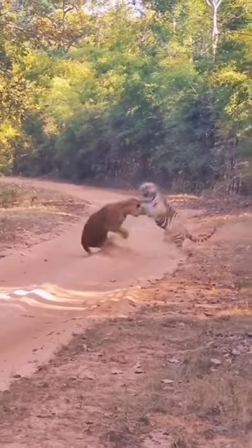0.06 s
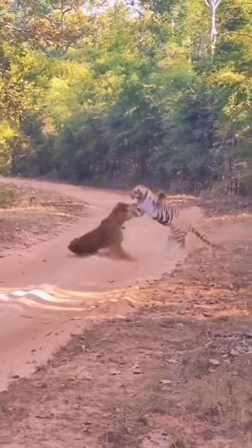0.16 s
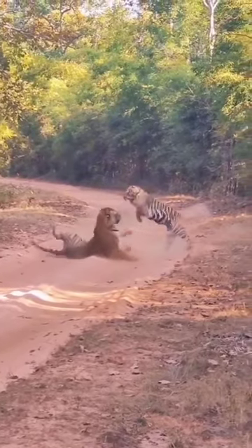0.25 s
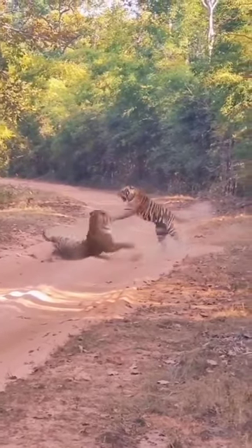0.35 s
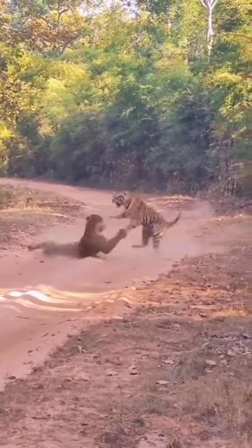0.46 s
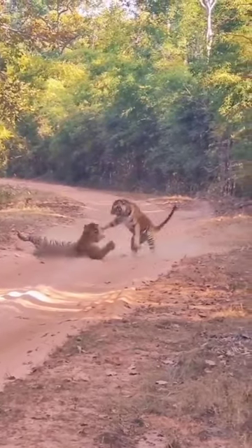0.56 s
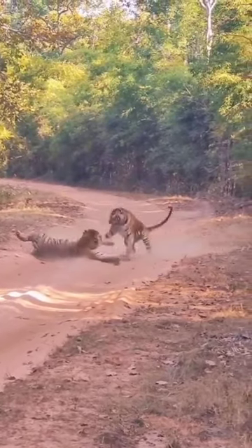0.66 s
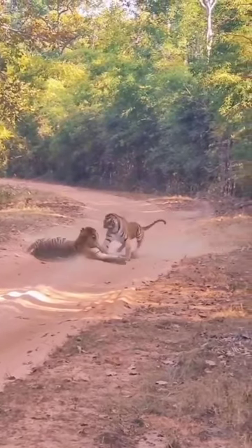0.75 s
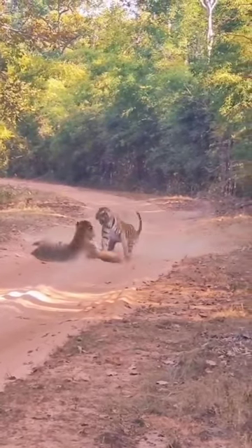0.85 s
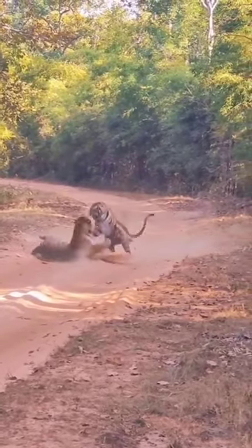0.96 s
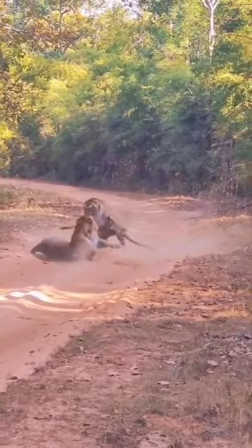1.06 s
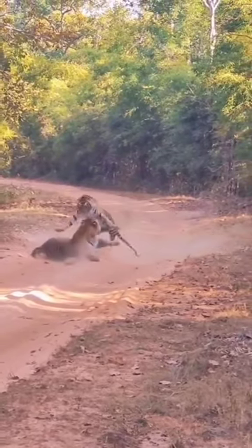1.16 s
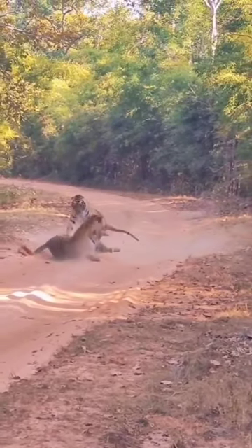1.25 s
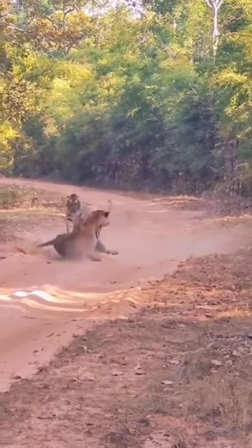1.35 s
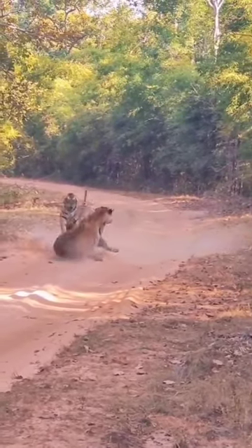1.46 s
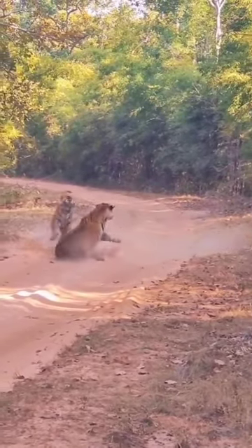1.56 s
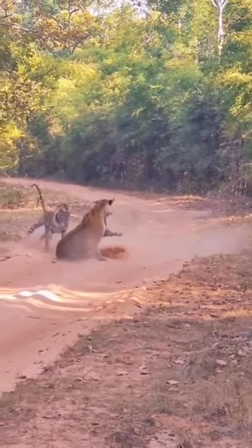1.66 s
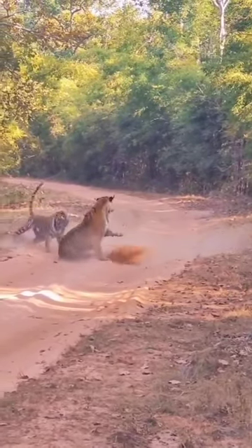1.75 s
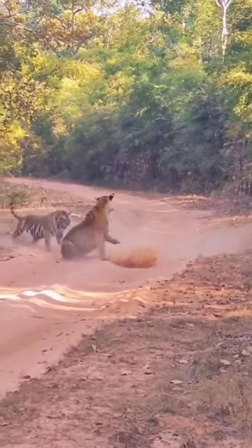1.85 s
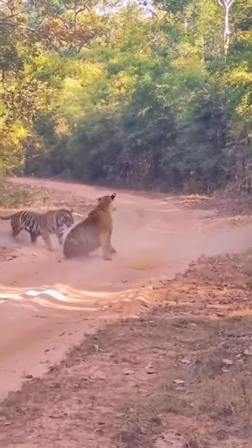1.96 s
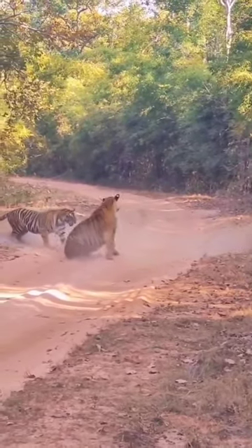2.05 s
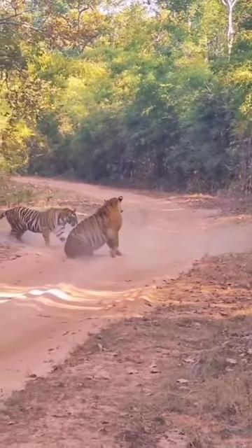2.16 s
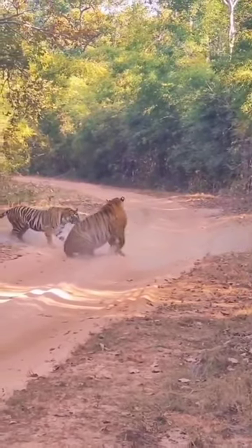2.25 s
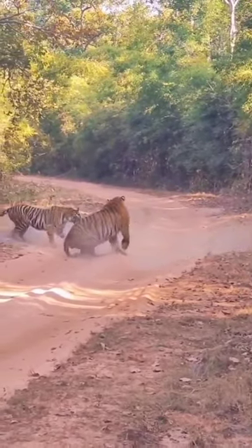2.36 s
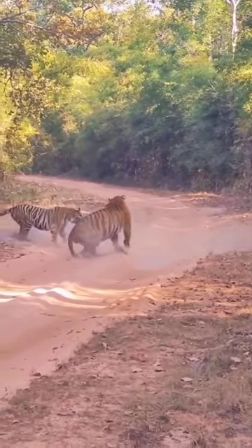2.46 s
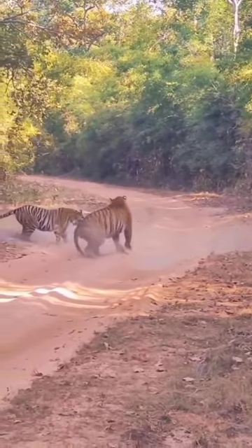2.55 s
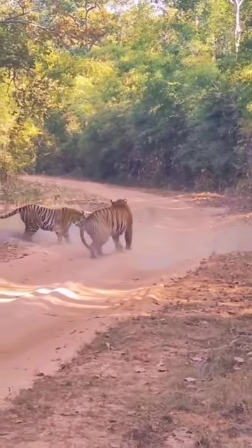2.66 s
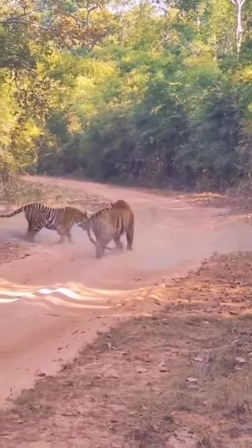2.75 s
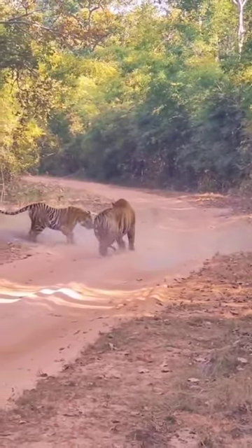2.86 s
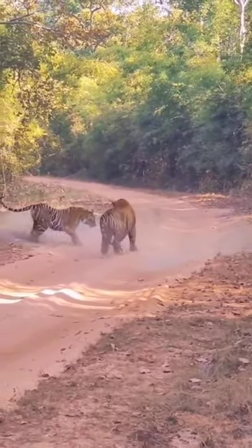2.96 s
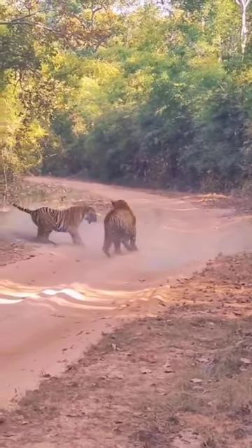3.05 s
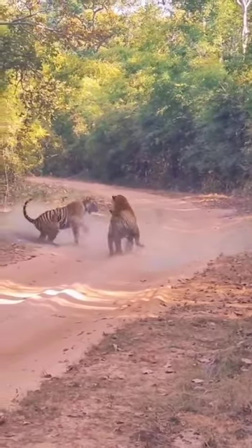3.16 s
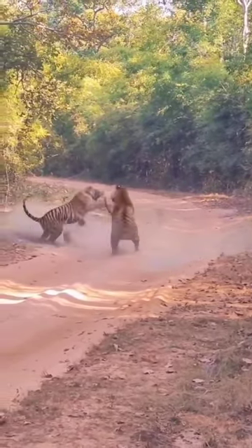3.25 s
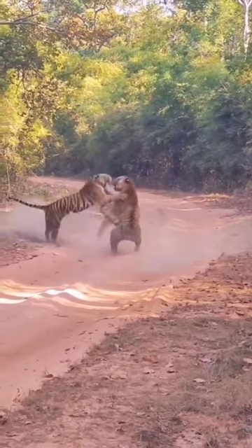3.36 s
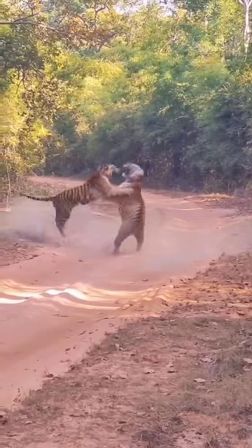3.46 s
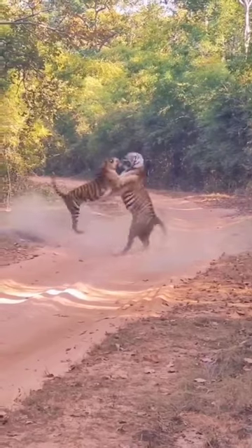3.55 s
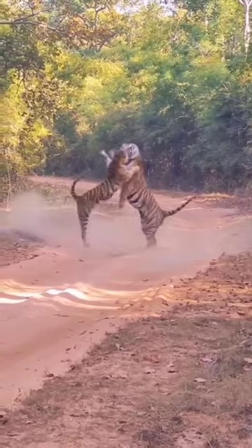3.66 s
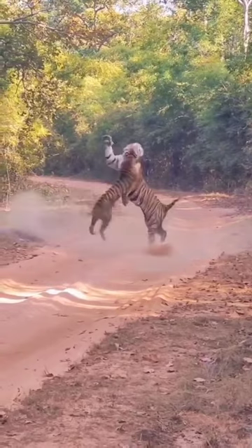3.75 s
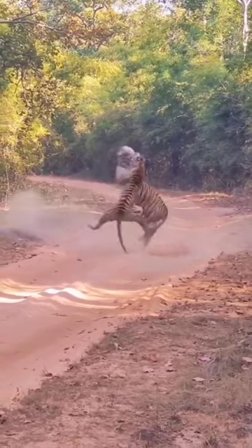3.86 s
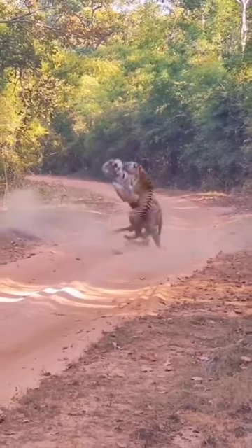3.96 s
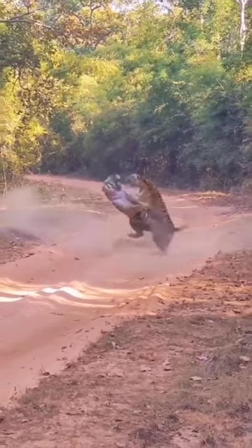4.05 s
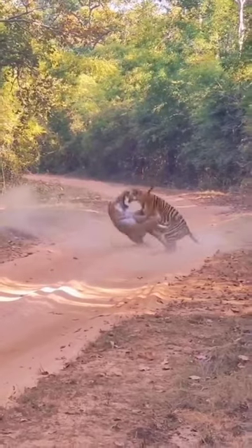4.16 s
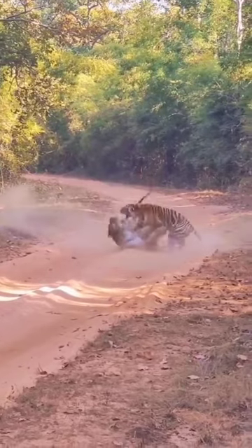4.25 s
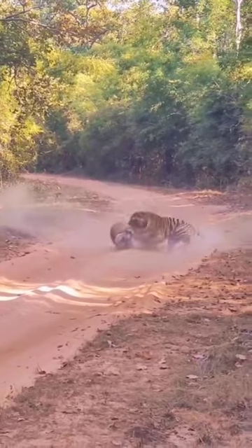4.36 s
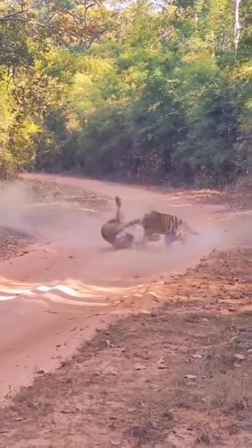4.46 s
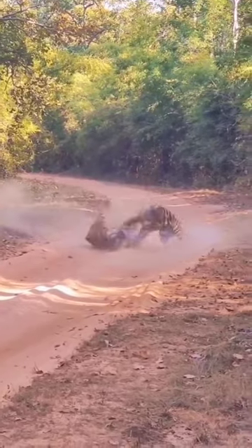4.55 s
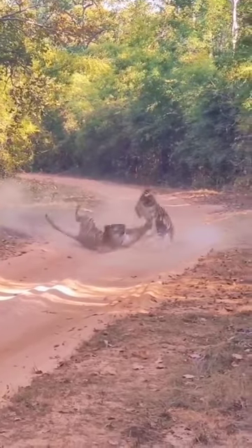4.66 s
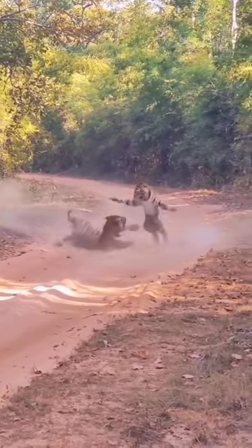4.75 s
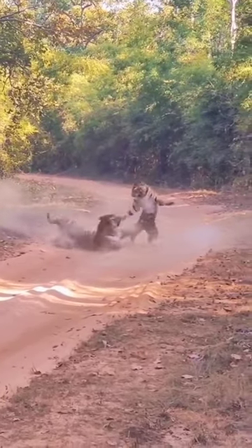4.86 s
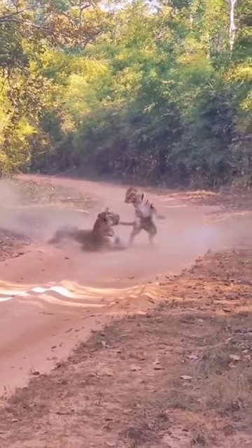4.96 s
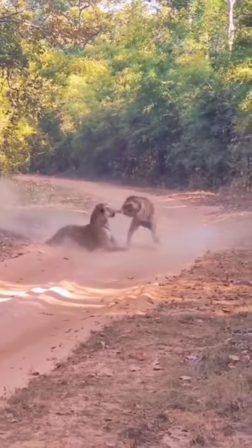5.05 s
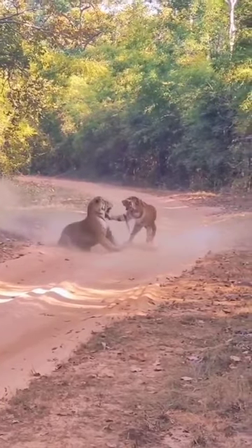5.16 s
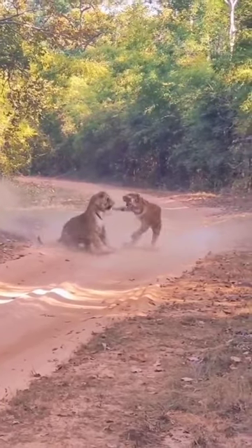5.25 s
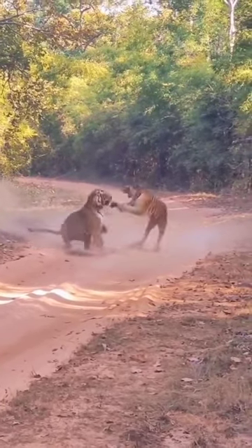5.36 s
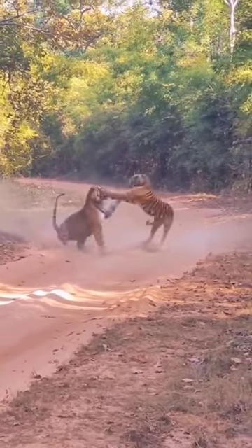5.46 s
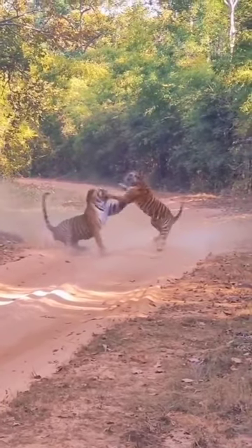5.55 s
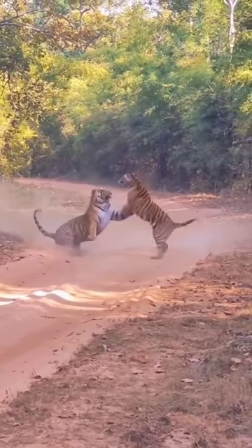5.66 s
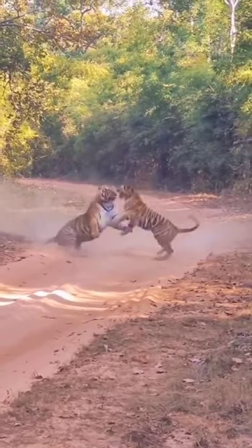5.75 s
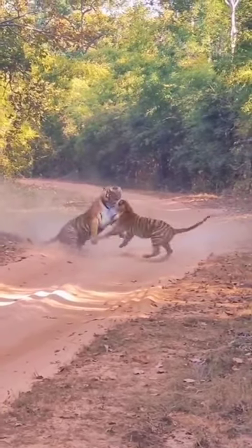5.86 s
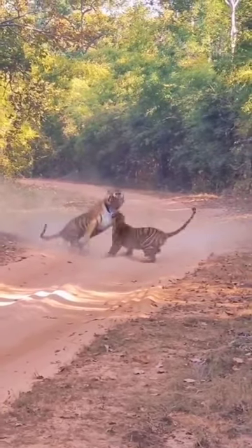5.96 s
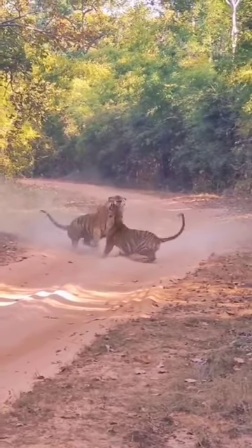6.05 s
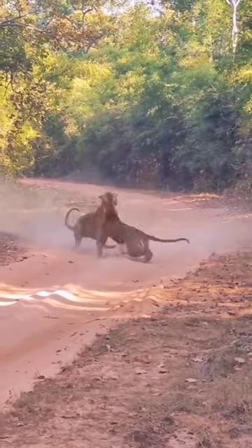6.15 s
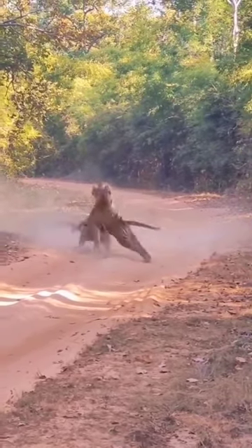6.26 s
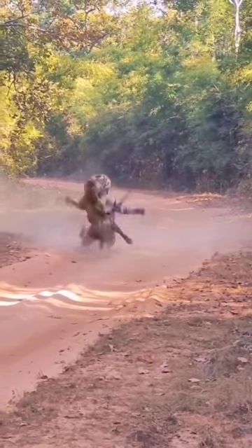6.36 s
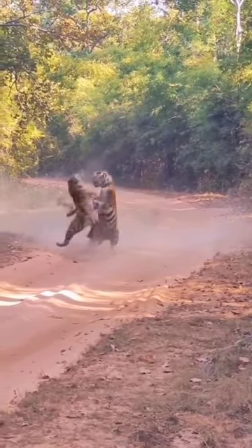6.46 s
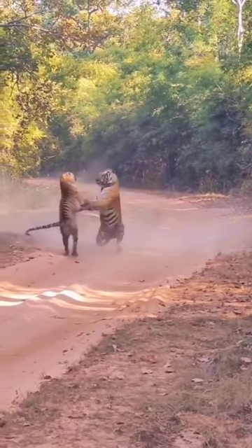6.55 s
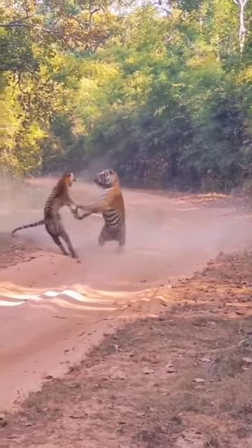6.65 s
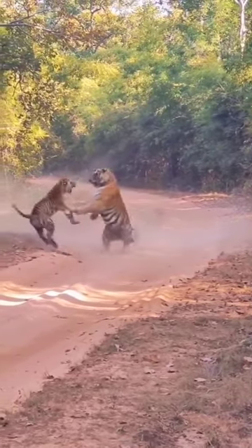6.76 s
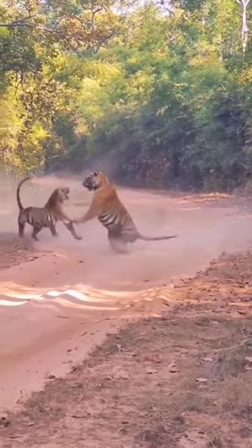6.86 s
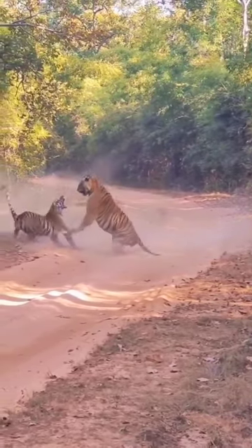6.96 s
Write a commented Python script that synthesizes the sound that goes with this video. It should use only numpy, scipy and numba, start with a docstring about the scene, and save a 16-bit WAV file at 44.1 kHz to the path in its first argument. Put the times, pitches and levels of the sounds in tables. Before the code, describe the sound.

On a quiet forest track two tigers fight, heard in stereo from a short distance. From 0 to 1.9 seconds, coarse throaty roars burst out at about 0.2, 0.6, 1.1 and 1.6, each under a third of a second, with fluttering growls, raspy breathy snarls and a low held moan near 1.3 to 1.5. Paws scrape dry grit. The roars stop, and from 2.1 to 2.75 a camera shutter fires eight fast, dry ticks with small rattles. Growling returns at 3.2, then roars erupt at 3.4 to 3.7, peaking around 4.2 with a strong, clear low note, followed by a short bark at 4.45 and another roar at 4.6. Twigs crack and paws swipe the dirt. Another roar at 5.4 gives way to weaker snarls near 6, 6.3 and 6.6, while scuffing grows towards 7. Trees return short, diffuse echoes.

```python
"""Tigers fighting on a forest track

Two tigers roar in quick bursts with low growls in between. Slack vocal folds slap unevenly and ring the
throat; at the height of some roars they lock into a clean note. Air chopped by the folds makes the snarl:
noise through the pharynx, mouth and teeth. In a lull a camera shutter fires a burst of ticks and rattles.
Paws scuff the dirt and snap twigs (shaped noise), and the trees answer with two echoes (decaying noise)."""
import sys
import numpy as np
from scipy import signal
from scipy.fft import rfft, irfft, next_fast_len
from scipy.io import wavfile
from scipy.ndimage import uniform_filter1d, map_coordinates
from numba import njit

SR = 44100
rng = np.random.default_rng(int(sys.argv[2]) if len(sys.argv) > 2 else 0)


def wav_out(sig):
    """Save sig, one row per channel (or a flat mono array), as 16-bit PCM at SR to the path in sys.argv[1]."""
    wavfile.write(sys.argv[1], SR, np.round(np.clip(np.atleast_2d(sig).T, -1, 1) * 32767).astype(np.int16))


N = 308744

# roars and snarls: (start [s], rise [s], fall [s], lag of the jaws [s],
# resonances at the peak of throat [Hz], pharynx [Hz], mouth [Hz],
# peak level of throat [dB], pharynx [dB], mouth [dB], hiss at the teeth [dB])
ROARS = [ (-0.1, 0.081, 0.12, 0, 287, 487, 1690, -22.5, -27.5, -35.5, -36),
         (0.128, 0.14, 0.12, 0.0099, 261.6, 556, 1170, -10, -23, -33, -35),
         (0.52, 0.073, 0.094, 0.00026, 292.5, 830, 1300, -12.5, -22.5, -24, -25.5),
         (0.997, 0.084, 0.093, 0, 296.4, 834, 1980, -13, -24, -27.5, -25),
         (1.279, 0.049, 0.14, 0.021, 238, 870, 1690, -25.5, -34, -35.5, -40.5),
         (1.567, 0.069, 0.065, 0.00072, 316.1, 848, 2300, -16.5, -24.5, -24.5, -23),
         (1.871, 0.084, 0.031, 0, 238.3, 756, 1742, -36.5, -36.5, -37.5, -35),
         (3.226, 0.043, 0.061, 0, 206, 533, 1919, -30.5, -30, -38, -44.5),
         (3.402, 0.038, 0.14, 0.00035, 311.4, 970, 1628, -17.5, -26, -28.5, -30),
         (3.534, 0.058, 0.12, 0.00082, 273.4, 835, 1109, -10, -27, -26.5, -30.5),
         (3.731, 0.1, 0.097, 0.003, 215.6, 613, 960, -20.5, -29.5, -35, -38.5),
         (3.998, 0.19, 0.11, 0.024, 272.7, 880, 1200, -12, -25, -27.5, -30.5),
         (4.301, 0.081, 0.058, 0, 250.2, 412, 1870, -18.5, -31, -41.5, -37.5),
         (4.568, 0.078, 0.0997, 0.016, 300.6, 854, 1730, -11.5, -23, -29.5, -27),
         (4.761, 0.065, 0.058, 0, 284.5, 403, 1570, -21.5, -31, -31.5, -36),
         (5.024, 0.039, 0.087, 0, 224.4, 607, 1610, -25.5, -32.5, -33.5, -39),
         (5.331, 0.086, 0.069, 0, 290.2, 867.5, 1320, -12.5, -23.5, -28, -30.5),
         (5.88, 0.12, 0.097, 0.0072, 334.3, 821.5, 1175, -22, -27, -31.5, -29),
         (6.299, 0.035, 0.086, 0.01, 226.4, 803, 1890, -40, -35, -38, -37),
         (6.555, 0.081, 0.084, 0.015, 346.4, 842, 1450, -23.5, -27, -33.5, -34.5), ]
# colour the chest gives to growls and to the rumble under a roar: (frequency [Hz], level [dB])
CHEST = [(20, -58.5), (45, -20), (75, -11.5), (110, -4), (230, 3.5), (330, -58)]


def amp(db):
    """Turn decibels into gain."""
    return 10 ** (np.asarray(db) / 20)


def unit(x):
    """Scale to an rms of 1."""
    return x / np.sqrt(np.mean(x ** 2) + 1e-20)


def steady(x, span):
    """Even out the loudness to rms 1 over about span seconds; faster flutter stays."""
    size = max(int(span * SR / 2), 2)
    power = uniform_filter1d(uniform_filter1d(x ** 2, size), size)
    floor = 1e-4 * np.mean(x ** 2)
    return x / np.sqrt(np.abs(power) + floor)


def along(points, hz):
    """Read (frequency [Hz], value) points along a logarithmic frequency axis."""
    f, v = np.transpose(points)
    return np.interp(np.log(hz + 1), np.log(f + 1), v)


def curves(rows):
    """Draw one curve over time for each column after the time."""
    s, *cols = np.transpose(rows)
    return [np.interp(np.arange(N) / SR, s, c) for c in cols]


def wobble(rate):
    """Draw a smooth random curve with rate knots a second."""
    knots = rng.standard_normal(int(N * rate / SR) + 4)
    return map_coordinates(knots, [np.arange(N) * rate / SR])


def during(rows, fade):
    """Gate that is 1 from the first row's time to the last, with soft edges."""
    t = np.arange(N) / SR
    inside = np.minimum(t - rows[0][0], rows[-1][0] - t)
    return np.clip(inside / fade + .5, 0, 1)


def filtered(x, response):
    """Multiply the spectrum of x by a response to frequency."""
    m = next_fast_len(N + SR // 2)
    return irfft(rfft(x, m) * response(np.fft.rfftfreq(m, 1 / SR)), m)[..., :N]


def coloured(x, spectrum):
    """Pass x through a (frequency [Hz], level [dB]) spectrum."""
    return filtered(x, lambda hz: amp(along(spectrum, hz)))


@njit
def sweep(x, step, damping):
    """A two-pole band-pass whose centre may move with every sample."""
    out, low, band = np.zeros(len(x)), 0.0, 0.0
    for i in range(len(x)):
        low += step[i] * band
        band += step[i] * (x[i] - low - damping * band)
        out[i] = band
    return out


def resonate(x, centre_hz, q):
    """Tongue and lips keep a cavity's resonance moving; two passes make its skirts steep."""
    waver_octaves = 0.11 * wobble(24)
    hz = np.minimum(centre_hz * 2 ** waver_octaves, SR / 6)
    step, damping = 2 * np.sin(np.pi * hz / SR), 1 / max(q, 2)
    once = sweep(x, step, damping)
    return steady(sweep(once, step, damping), span=.1)


def patchy(x, depth_db):
    """Let random peaks and dips come and go across the spectrum."""
    z = signal.stft(x, nperseg=512)[2]
    field = rng.standard_normal(z.shape)
    field = uniform_filter1d(field, 3, 0)  # smooth over frequency
    field = uniform_filter1d(field, 10, 1)  # smooth over time
    return signal.istft(z * amp(depth_db * unit(field)), nperseg=512)[1][:N]


def lay(at, grains):
    """Sum rows of grains, each starting at its own sample."""
    places = at[:, None] + np.arange(grains.shape[1])
    return np.bincount(places.ravel(), grains.ravel(), N)[:N]


def clicks(rows, spectrum, t60, rise):
    """Dry contacts at (time [s], level [dB]): dying bursts of noise through a body's colour."""
    s, db = np.transpose(rows)
    t = np.arange(SR // 12) / SR
    envelope = amp(db[:, None] - 60 * t / t60) * (1 - np.exp(-t / rise))
    grains = envelope * rng.standard_normal((len(s), len(t)))
    return coloured(lay(np.round(s * SR).astype(int), grains), spectrum)


def folds(rate_hz, jitter, scatter_db, puff):
    """Slack folds slap unevenly: return slap samples, sizes, the slap train and the puffs of air let through."""
    cycles = np.cumsum(rate_hz * np.exp(jitter * wobble(70))) / SR
    at = np.flatnonzero(np.diff(np.floor(cycles)))
    size = amp(scatter_db * rng.standard_normal(len(at)))
    slaps = unit(np.bincount(at, size, N))
    t = np.arange(SR // 30) / SR
    puffs = unit(lay(at, size[:, None] * t * np.exp(-t / puff)))
    return at, size, slaps, puffs


def air(puffs, leak):
    """Turbulent noise, chopped by the folds except for a steady leak."""
    return unit((puffs + leak) * rng.standard_normal(N))


def throat_ring(at, size, centre_hz, life, rise, spread):
    """Every slap sets off a dying sine at the resonance of that moment, give or take a spread."""
    t = np.arange(SR // 20) / SR
    hz = centre_hz[at] * np.exp(spread * rng.standard_normal(len(at)))
    envelope = np.exp(-t / life) * (1 - np.exp(-t / rise))
    return lay(at, size[:, None] * np.sin(2 * np.pi * hz[:, None] * t) * envelope)


def cycle_phase(pitch_hz, jitter):
    """Phase of folds that vibrate almost regularly."""
    return 2 * np.pi * np.cumsum(pitch_hz * (1 + jitter * wobble(150))) / SR


def harmonics(phase, levels):
    """Stack sines at whole multiples of the pitch, at rms 1."""
    return unit(sum(amp(db) * np.sin(k * phase) for k, db in enumerate(levels, 1)))


def swell(peaks_db, attacks_s, onset_s, depth_db, roundness, release_db_per_s):
    """Gain of each roar, one row each: it bursts in, swells by depth_db to its peak, sinks and is released."""
    t, gains = np.arange(N) / SR, np.zeros((len(ROARS), N))
    for gain, (start, rise, fall, *_), db, attack_s in zip(gains, ROARS, peaks_db, attacks_s):
        near = (t > start - onset_s) & (t < start + 1)
        age = t[near] - start
        # 0 at the peak, 1 where the roar begins and where its fall ends
        slack = np.clip(np.maximum(1 - age / rise, (age - rise) / fall), 0, 1)
        fading = release_db_per_s * np.maximum(age - rise - fall, 0)
        attack = np.clip((age + onset_s / 2) / attack_s, 0, 1)
        gain[near] = attack * amp(db - depth_db * slack ** roundness - fading)
    return gains


def effort():
    """Gains of throat, pharynx, mouth and teeth, then the resonances; the snarl waits for the jaws."""
    (start, rise, _, lag, hz, pharynx_hz, mouth_hz,
     throat_db, pharynx_db, mouth_db, hiss_db) = np.transpose(ROARS)
    folds_s, jaws_s = 0.0118, 0.032  # attack times: the folds start faster than the jaws
    at_once, with_jaws = np.full(len(ROARS), folds_s), jaws_s + 2 * abs(lag)
    layers = [swell(throat_db, at_once, folds_s, depth_db=8.0, roundness=0.87, release_db_per_s=190.5),
              swell(pharynx_db, with_jaws, jaws_s, depth_db=3.5, roundness=2.1, release_db_per_s=110.5),
              swell(mouth_db, with_jaws, jaws_s, depth_db=4.5, roundness=2.0, release_db_per_s=172.0),
              swell(hiss_db, with_jaws, jaws_s, depth_db=4.0, roundness=1.5, release_db_per_s=144.0)]
    gains = [np.linalg.norm(layer, axis=0) + 1e-9 for layer in layers]
    loudest = np.argmax(layers[0], axis=0)  # this roar sets the resonances
    age = np.maximum(np.arange(N) / SR - start[loudest], 0)
    # slow jaws let the throat's resonance start up to 0.3 octaves lower
    opening = 0.3 * np.exp(-age / (2 * abs(lag[loudest]) + 1e-4))
    # it sinks by 2.8 octaves a second around the peak as the jaws close
    closing = 2.8 * np.clip(age - rise[loudest], -0.07, 0.09)
    glide = 2 ** (-opening - closing)
    upper_glide = glide ** 0.25  # the upper resonances follow a quarter of the glide
    upper = [f[loudest] * upper_glide for f in (pharynx_hz, mouth_hz)]
    return gains, [hz[loudest] * glide] + upper


def roars():
    """Fold slaps ring throat and pharynx, and chop the air that rasps through the open mouth in surges."""
    # broad colour of each cavity: (frequency [Hz], level [dB])
    pharynx_colour = [(200, -34.5), (390, 8), (600, 1), (950, -1.5), (1400, -72)]
    mouth_colour = [(600, -22.5), (950, -10), (1100, -2.5), (1600, 1), (2100, -4), (2700, -15), (4500, -33)]
    teeth_colour = [(1500, -11.5), (2300, 2), (4000, 2.5), (6100, 2.5), (7000, -13.5), (8200, -14),
                    (10300, -14), (13000, -28)]
    (throat_gain, pharynx_gain, mouth_gain, hiss_gain), (centre_hz, pharynx_hz, mouth_hz) = effort()
    slap_hz = 64 * (centre_hz / 280) ** .5
    at, size, slaps, puffs = folds(slap_hz, jitter=.3, scatter_db=3.5, puff=0.0094)
    notes, locked = clean_notes()

    ring = unit(throat_ring(at, size, centre_hz, life=.0075, rise=.004, spread=.09))
    ring = filtered(ring, lambda hz: hz ** 4 / (hz ** 4 + 150 ** 4))  # the mouth radiates little bass
    throat = steady(ring, span=0.024)

    # each cavity adds a narrower resonance to its broad colour
    drive = 0.38 * slaps + air(puffs, leak=1.0)
    pharynx = unit(coloured(drive, pharynx_colour)) + amp(-2.5) * resonate(drive, pharynx_hz, q=4.77)
    pharynx = steady(patchy(pharynx, depth_db=2.2), span=.09)

    rasp = air(puffs, leak=2.0) + 0.37 * slaps
    mouth = unit(coloured(rasp, mouth_colour)) + amp(-3.5) * resonate(rasp, mouth_hz, q=3.8)
    mouth = steady(patchy(mouth, depth_db=5), span=.08)

    jet = air(puffs, leak=4.1)
    teeth_ring = resonate(air(puffs, leak=0.64), 5120, q=3.1)  # the gap between the teeth rings
    hiss = unit(coloured(jet, teeth_colour)) + amp(-10) * teeth_ring
    hiss = steady(patchy(hiss, depth_db=4.6), span=.1)

    surge = amp(1.7 * wobble(32))
    rumble = amp(-11.0) * unit(coloured(air(puffs, leak=0.5), CHEST))
    # a locked note pushes the uneven ringing back
    voice = throat_gain * amp(-18 * locked) * throat + notes
    body = pharynx_gain * (amp(-3 * locked) * pharynx + rumble)
    snarl = surge * (mouth_gain * mouth + hiss_gain * hiss)
    return voice + body + snarl + flares(puffs)


def growls():
    """Slower slaps ring the chest; each growl starts quickly and fades more slowly."""
    # low growls: (start [s], end [s], level [dB], chest resonance [Hz])
    growl_rows = [(0, 0.146, -27, 196), (0.27, 0.454, -30, 147.5), (1.548, 1.594, -24, 144.4),
                  (1.902, 1.975, -29, 136), (2.485, 2.663, -49.5, 132.2), (2.912, 3.0, -52, 160),
                  (3.214, 3.304, -27.5, 171), (3.386, 3.419, -27.5, 199), (3.73, 4.478, -35, 143.2),
                  (4.522, 4.596, -23, 232), (4.731, 4.913, -31.5, 161.5), (5.015, 5.149, -33, 140),
                  (5.329, 5.512, -30, 208), (5.855, 6.115, -36, 144.5), (6.298, 6.44, -32, 189.9),
                  (6.548, 6.992, -43, 172)]
    t, force = np.arange(N) / SR, np.zeros(N)
    for start, end, db, _ in growl_rows:
        onset = (1 + np.tanh((t - start) / 0.007)) / 2
        force += amp(db) * onset * np.exp(-np.maximum(t - end, 0) / 0.025)
    centre_hz, = curves([(s, hz) for start, end, _, hz in growl_rows for s in (start, end)])
    at, size, _, _ = folds(rate_hz=52, jitter=.25, scatter_db=7.5, puff=0.0029)
    ring = throat_ring(at, size, centre_hz, life=0.0046, rise=0.0032, spread=0.2)
    return force * steady(coloured(ring, CHEST), span=0.017)


def litter():
    """Paws grind the grit in uneven strokes, swipe through it and crack dry twigs."""
    # paws scuffing through dust and litter: (time [s], level [dB])
    scuffle = [(0, -39), (1.7, -42.5), (2.3, -49), (3.15, -61), (3.45, -45.5), (5.3, -40), (6.2, -46.5),
               (7, -34.5)]
    # single hard swipes of a paw: (time [s], half length [s], level [dB])
    swipe_rows = [(0.379, 0.02, -32.5), (0.956, 0.067, -40.5), (1.452, 0.061, -39.5), (3.591, 0.014, -28),
                  (4.995, 0.019, -35), (5.838, 0.042, -37.5), (6.22, 0.051, -34), (6.652, 0.015, -29),
                  (6.874, 0.023, -36)]
    # twigs and dry leaves breaking: (time [s], level before colour [dB])
    snaps = [(.946, -30), (4.334, -27), (5.023, -29.5), (5.763, -26.5), (5.818, -32.5), (5.838, -27),
             (6.371, -28.5)]
    # colour of twigs and grit: (frequency [Hz], level [dB])
    twig = [(40, -13), (300, 15), (6000, 12), (8000, 0.5), (13000, -6.5)]
    t = np.arange(N) / SR
    scuffle_db, = curves(scuffle)
    strokes = amp(scuffle_db + 3 * wobble(25))
    swipes = sum(amp(db) * np.exp(-((t - s) / half) ** 2) for s, half, db in swipe_rows)
    grit = rng.standard_normal(N) * amp(1.6 * wobble(500))
    scrape = steady(patchy(coloured(grit, twig), depth_db=3.5), span=.1)
    cracks = clicks(snaps, twig, t60=.032, rise=.001)
    return (strokes + swipes) * scrape + cracks


def quiet_forest():
    """A faint, constant bed of coloured noise."""
    # colour of the quiet forest: (frequency [Hz], level [dB])
    forest_colour = [(25, -11), (180, 1.5), (3500, -36.5), (5800, -9), (7500, -33), (13000, -37)]
    return amp(-63) * unit(coloured(rng.standard_normal(N), forest_colour))


def trees(x, delay_s):
    """Trunks and foliage scatter a thin tail, each frequency dying at its own speed."""
    # how long the tail takes to fade by 60 dB: (frequency [Hz], time [s])
    fade_times = [(100, 0.17), (600, 0.93), (10000, 0.66)]
    hz, t, z = signal.stft(rng.standard_normal(SR), SR, nperseg=256)
    decay = amp(-60 * t / along(fade_times, hz)[:, None])
    tail = signal.istft(z * decay, SR, nperseg=256)[1]
    late = np.pad(x, (int(delay_s * SR), 0))
    return signal.fftconvolve(late, tail / np.linalg.norm(tail))[:N]


def echoes(direct):
    """Trees send the sound back, and the far wall of forest answers later."""
    # colour of what each sends back: (frequency [Hz], level [dB])
    near_colour = [(200, -33), (290, -4), (410, -10), (550, -7), (830, 2), (1100, 1), (6000, -20)]
    far_colour = [(40, -12), (100, 9.5), (290, -8.5), (420, 0), (850, 1.5), (1400, -3), (3000, 1.5),
                  (6000, -7.5), (12000, -32)]
    near = amp(-13.5) * coloured(trees(direct, delay_s=0.041), near_colour)
    far = amp(-15) * coloured(trees(direct, delay_s=0.2), far_colour)
    return near + far


def barks():
    """A few hard cycles of the folds, cut off short, the third harmonic growing."""
    # short barks: (time [s], length [s], level [dB], pitch [Hz])
    bark_rows = [(0.127, 0.018, -28, 265), (0.473, 0.011, -24, 204), (3.995, 0.017, -22, 259.7),
                 (4.446, 0.026, -16, 205.3), (6.51, 0.016, -34.5, 189)]
    out = np.zeros(N)
    for s, length, db, hz in bark_rows:
        t = np.arange(int(length * SR)) / SR
        phase = 2 * np.pi * hz * t
        wave = np.sin(phase) + 0.33 * np.sin(2 * phase) + 1.03 * t / length * np.sin(3 * phase)
        out[round(s * SR):][:len(t)] += amp(db) * unit(wave * signal.windows.tukey(len(t), .5))
    return out


def flares(puffs):
    """The jaws gape within a snarl, and chopped air rings one cavity hard for a moment."""
    # moments of ringing: (time [s], half length [s], resonance [Hz], level [dB])
    flare_rows = [(0.341, 0.01, 1200, -28), (0.593, 0.018, 1428, -21), (0.646, 0.018, 1340, -29.5),
                  (1.058, 0.029, 760, -23), (1.657, 0.02, 4280, -22), (3.533, 0.026, 1730, -30),
                  (4.606, 0.017, 554, -21), (4.76, 0.046, 5100, -31.5), (5.931, 0.06, 1006, -30.5),
                  (5.93, 0.052, 4950, -32.5), (6.892, 0.076, 1420, -36.5)]
    t, out = np.arange(N) / SR, np.zeros(N)
    rasp = air(puffs, leak=0.8)
    for s, half, hz, db in flare_rows:
        out += amp(db) * np.exp(-((t - s) / half) ** 2) * resonate(rasp, hz, q=5.2)
    return out


def clean_notes():
    """The folds lock onto the throat's resonance; returns the notes and how firmly they are locked."""
    # one list for each note at the top of a loud roar: (time [s], pitch [Hz], level [dB])
    note_rows = [
        [(0.638, 279.5, -27), (0.648, 268, -12), (0.66, 266, -9.5)],
        [(1.065, 287.8, -9), (1.089, 288, -13), (1.15, 266.2, -9), (1.18, 257, -17)],
        [(3.555, 289.2, -11.5), (3.598, 275, -10), (3.66, 240.7, -13.5)],
        [(4.11, 307.8, -12.5), (4.168, 308.6, -5.5), (4.183, 309, -18), (4.204, 305, -3.5)],
        [(4.625, 310, -9), (4.653, 288, -8.5), (4.71, 293, -11)],
    ]
    # balance of harmonics 1, 2, ..: level [dB]
    overtones = [7, -18, -17, -23]
    notes, locked = np.zeros(N), np.zeros(N)
    for rows in note_rows:
        pitch, db = curves(rows)
        gate = during(rows, fade=0.006)
        tone = harmonics(cycle_phase(pitch, jitter=0.023), overtones)
        notes += gate * amp(db + 1.3 * wobble(110)) * tone
        locked += gate
    return notes, locked


def moan():
    """A low growl that holds a pitch; its fifth harmonic catches the mouth's resonance."""
    # the held growl: (time [s], pitch [Hz], voice level [dB], added fifth harmonic level [dB])
    moan_rows = [(1.27, 120.7, -36, -40), (1.31, 107.2, -29, -43), (1.355, 120.6, -29, -39),
                 (1.39, 114.1, -35.5, -22), (1.44, 113.7, -35.5, -37), (1.515, 111.4, -36, -31.5)]
    # balance of harmonics 1, 2, ..: level [dB]
    overtones = [11.5, -13, 8.5, 8.5]
    pitch, db, ring_db = curves(moan_rows)
    phase = cycle_phase(pitch, jitter=0.031)
    fifth = unit(np.sin(5 * phase))
    voice = amp(db) * harmonics(phase, overtones) + amp(ring_db) * fifth
    return during(moan_rows, fade=0.017) * amp(1.6 * wobble(60.4)) * voice


def shutter():
    """Each frame of the burst runs through the same clacks: a hard tick and a brief rattle."""
    # the camera's burst of frames: (time [s], level before cycle and colour [dB])
    frames = [(2.083, -27.5), (2.174, -29.5), (2.265, -28), (2.351, -29.5), (2.436, -29), (2.519, -28),
              (2.605, -27), (2.692, -31)]
    # mirror and curtains in each frame: (time after release [s], level [dB])
    cycle = [(0, 0.5), (.009, -5), (0.041, -5.5), (0.055, -7.5), (0.07, -4)]
    # colour of the camera's body: (frequency [Hz], level [dB])
    body = [(600, -27), (1400, 0.5), (2700, 2), (3300, 3), (3900, -4.5), (5600, -0.5), (7500, -24),
            (13000, -26)]
    clacks = [(s + delay, db + level) for s, db in frames for delay, level in cycle]
    ticks = clicks(clacks, body, t60=.014, rise=.0004)
    rattle = clicks(clacks, body, t60=.075, rise=.002)
    return amp(3.5) * ticks + amp(-2.0) * rattle


def spread(mid):
    """Short waves reach the two microphones with unrelated phases, so only the treble spreads wide."""
    # how far the two sides differ: (frequency [Hz], level [dB])
    width = [(3600, -70), (3900, -3), (7000, -2), (13000, -5)]
    z = signal.stft(mid, nperseg=128)[2]
    random_turns = np.exp(2j * np.pi * rng.random(z.shape))
    scattered = signal.istft(z * random_turns, nperseg=128)[1][:N]
    side = coloured(scattered, width)
    return np.array([mid + side, mid - side])


def scene():
    """The fight, the shutter, the echoes and the quiet forest, in stereo."""
    direct = roars() + growls() + litter() + barks() + moan() + shutter()
    return spread(direct + echoes(direct) + quiet_forest())


def record(dry):
    """Round off the highest peaks and keep nothing above the band limit."""
    top_hz = 13400
    held = dry / (1 + np.abs(dry / .9) ** 8) ** (1 / 8)
    return filtered(held, lambda hz: hz < top_hz)


dry = scene()
out = record(dry)
wav_out(out)
```